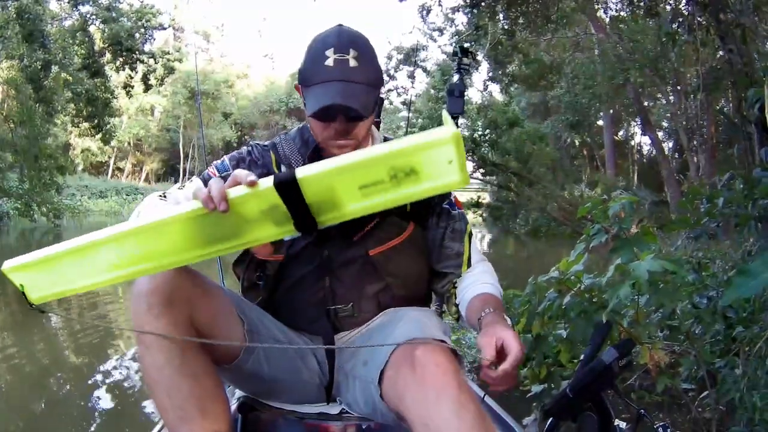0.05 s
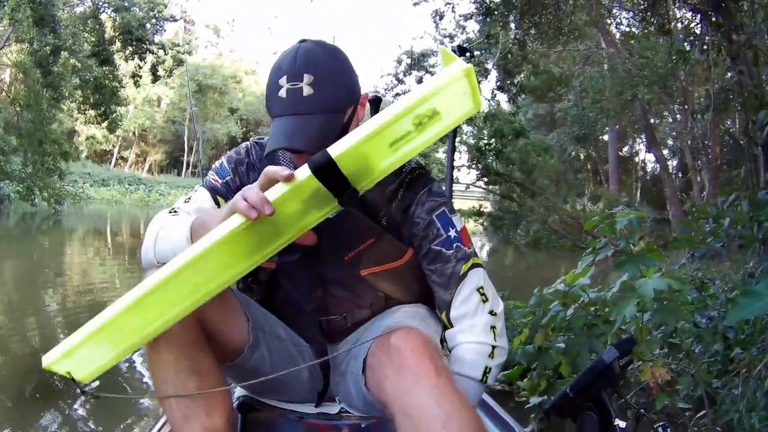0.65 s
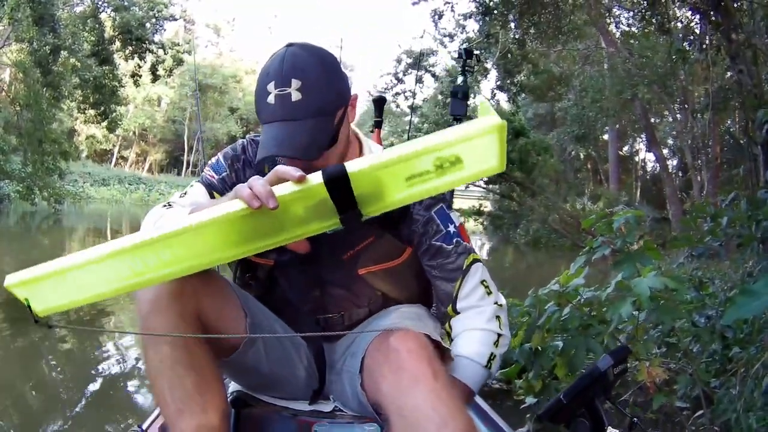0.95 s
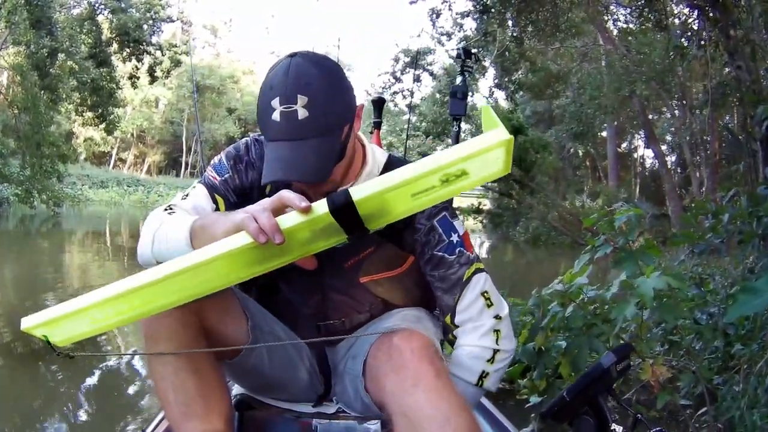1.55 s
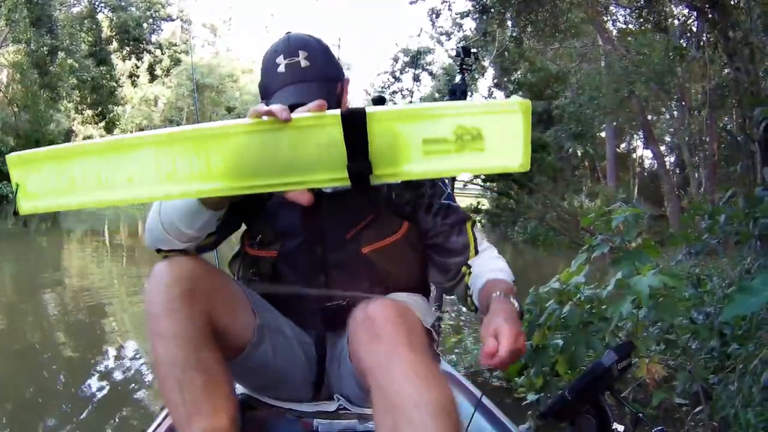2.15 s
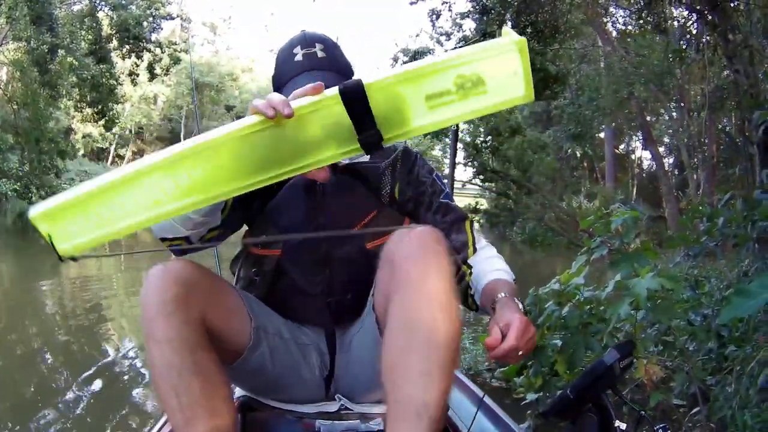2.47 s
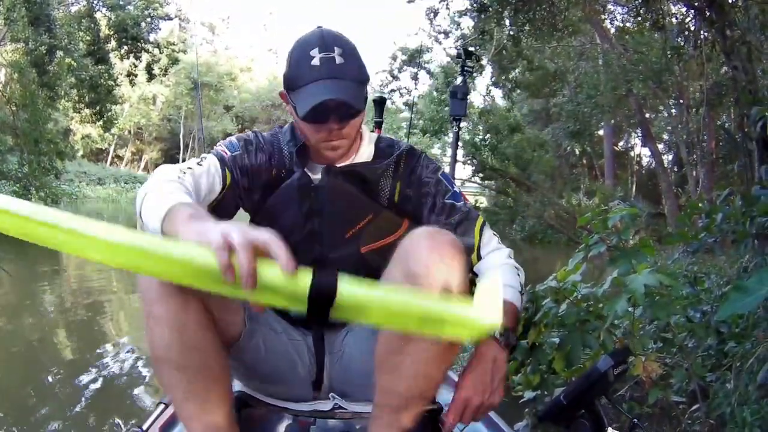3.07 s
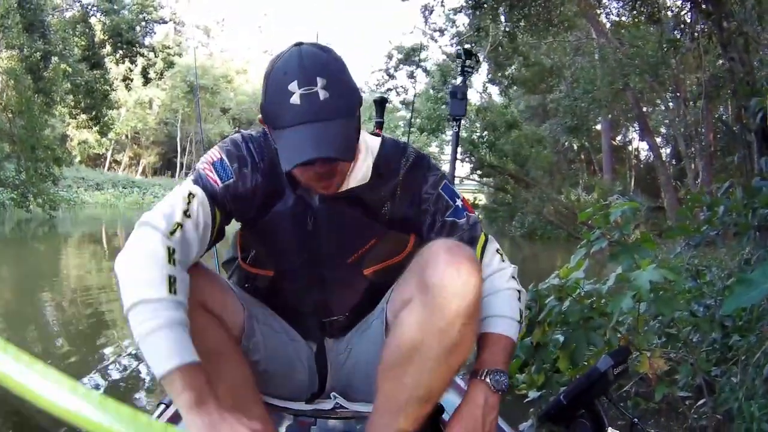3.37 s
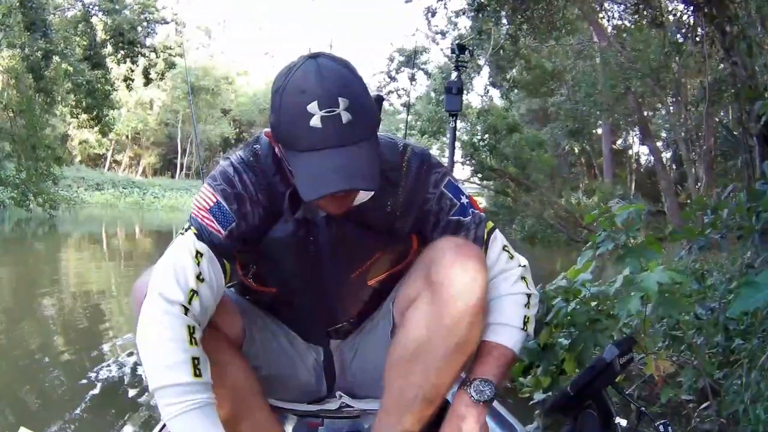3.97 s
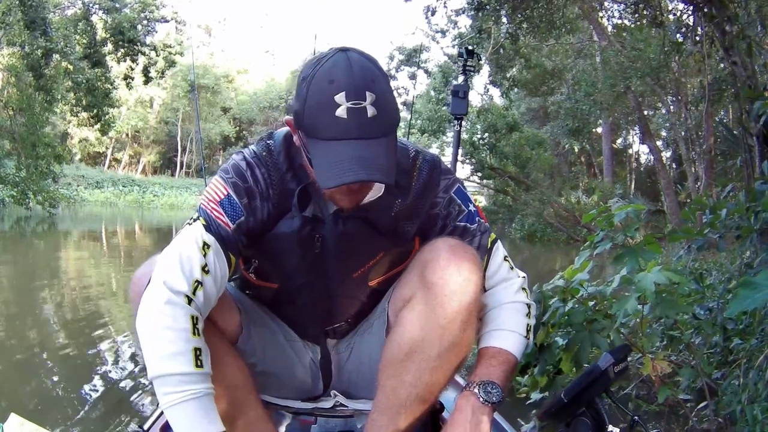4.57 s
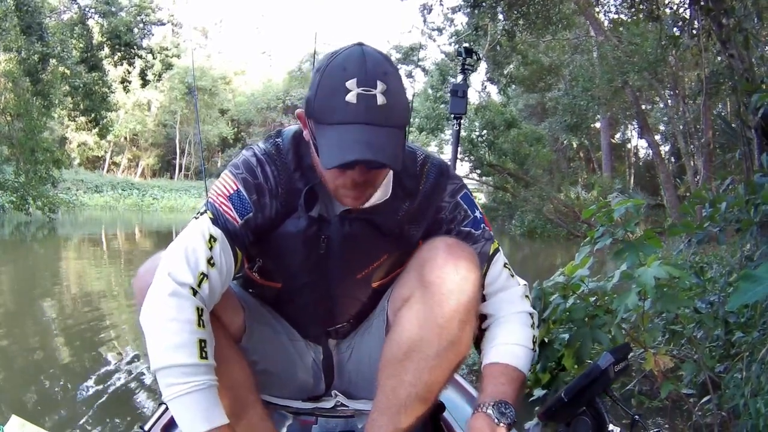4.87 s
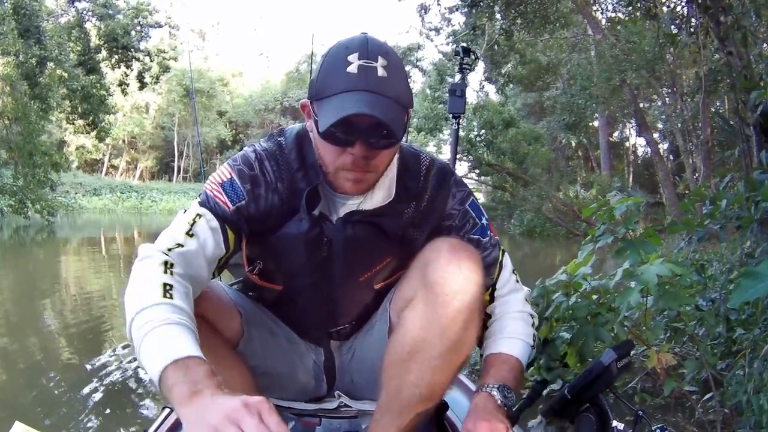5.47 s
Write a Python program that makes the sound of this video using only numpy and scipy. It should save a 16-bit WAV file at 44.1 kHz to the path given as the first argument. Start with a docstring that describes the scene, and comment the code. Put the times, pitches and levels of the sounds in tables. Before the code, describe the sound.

A hard plastic board is moved along the side of a plastic kayak, scraping and clattering with hollow booms, a low groan and a few short creaks. After a brief lull it slides down into the boat with a softer run of knocks and rubbing, ending in faint taps. Low outdoor rumble and thin hiss lie underneath. The close microphone is heard on the left only.

```python
"""Hollow booms, hard clacks and scraping: someone in a plastic kayak rummages along the hull with a
hard plastic measuring board, then slides it down into the boat. Blows and stick-slip friction ring
the hollow hull, the stiff plastic and its edges; catching parts lock on to a mode and groan or creak.
Low outdoor rumble and a thin hiss lie underneath. One close microphone feeds the left channel and
overloads on the hardest blows."""
import sys
import numpy as np
from scipy import signal
from scipy.fft import rfft, irfft, next_fast_len
from scipy.io import wavfile
from scipy.ndimage import uniform_filter1d, map_coordinates

SR = 44100
rng = np.random.default_rng(int(sys.argv[2]) if len(sys.argv) > 2 else 0)


def generate_wav(signal):
    """Clip the signal to [-1, 1] and save it as 16-bit WAV at the path in sys.argv[1]."""
    frames = np.transpose(np.atleast_2d(signal))
    scaled = np.clip(frames, -1, 1) * 32767
    pcm = np.round(scaled).astype(np.int16)
    wavfile.write(sys.argv[1], SR, pcm)


N = 252466

# Spectrum of the sharp edges. Each row: frequency in Hz, level in dB.
EDGE_SPECTRUM = [(1800, -28), (2900, -4.5), (3700, 3.5), (4400, -3), (5700, 5.5), (7000, -5), (8400, -5.5),
                 (9500, -12), (12000, -8.5), (15500, -40.5)]
# Plastic rubbing on the hull. Each row: time of firmest pressure in seconds, relative levels of
# plastic rasp, hull boom and edge scratch in dB, rise and fall in seconds.
RUB_STROKES = [(0.01, -46, -45, -67, 0.034, 0.044), (0.41, -55.5, -42.5, -76, 0.022, 0.42),
               (0.579, -40, -34, -58.5, 0.07, 0.037), (0.689, -44, -42, -67, 0.12, 0.17),
               (0.861, -32, -33.5, -51, 0.1, 0.056), (1.01, -42, -31, -62, 0.15, 0.24),
               (1.09, -24.5, -20.5, -45.5, 0.06, 0.14), (1.182, -26, -21.5, -46, 0.1, 0.064),
               (1.28, -32.5, -22, -55, 0.025, 0.041), (1.353, -31.5, -23, -54.5, 0.035, 0.092),
               (1.48, -34.5, -25.5, -56, 0.045, 0.12), (1.585, -31.5, -20, -46.5, 0.096, 0.12),
               (1.647, -27, -18.5, -46.5, 0.11, 0.13), (1.802, -34, -34.5, -54, 0.07, 0.037),
               (1.882, -34, -23, -50, 0.033, 0.068), (1.927, -30.5, -27, -50, 0.077, 0.12),
               (2.06, -61, -34.5, -78, 0.05, 0.054), (2.185, -40.5, -29.5, -63.5, 0.064, 0.14),
               (2.3, -54.5, -47, -77, 0.06, 0.22), (2.69, -68, -50.5, -65.5, 0.041, 0.06),
               (2.82, -53.5, -42.5, -79, 0.08, 0.089), (2.9, -39, -29, -66, 0.038, 0.11),
               (3.03, -39, -31.5, -61, 0.12, 0.14), (3.19, -51.5, -51, -66, 0.14, 0.31),
               (3.62, -47.5, -39.5, -70, 0.1, 0.087), (3.769, -33, -27.5, -63, 0.035, 0.12),
               (3.82, -29, -19.5, -45.5, 0.093, 0.076), (4.005, -33.5, -26, -52.5, 0.11, 0.13),
               (4.19, -34, -23, -53.5, 0.12, 0.126), (4.23, -42, -43, -53, 0.097, 0.068),
               (4.429, -41.5, -27.5, -55, 0.12, 0.073), (5.036, -49, -50.5, -77, 0.03, 0.054),
               (5.235, -58, -47, -80, 0.048, 0.11), (5.295, -56.5, -51, -74, 0.11, 0.15),
               (5.44, -56.5, -65, -80, 0.04, 0.11)]
STOW_S = 2.6  # rummaging ends, stowing begins


def amp(db):
    """Decibels to gain."""
    return 10 ** (np.asarray(db) / 20)


def unit(x):
    """x at rms 1."""
    return x / np.sqrt(np.mean(x ** 2) + 1e-20)


def steady(x, span_s):
    """x levelled to a running rms of 1."""
    size = max(int(span_s * SR), 2)
    power = uniform_filter1d(uniform_filter1d(x ** 2, size), size)
    return x / np.sqrt(np.abs(power) + 1e-12 * np.mean(x ** 2))


def wobble(rate_hz):
    """Smooth random curve, rate_hz knots a second."""
    knots = rng.standard_normal(int(N * rate_hz / SR) + 4)
    return map_coordinates(knots, [np.arange(N) * rate_hz / SR])


def body(spectrum, size=8192):
    """Minimum-phase impulse response from (Hz, dB) rows."""
    hz, db = np.transpose(spectrum)
    level_db = np.interp(np.log(np.fft.rfftfreq(size, 1 / SR) + 1), np.log(hz), db)
    cepstrum = irfft(np.log(amp(level_db)))
    cepstrum[1:size // 2] *= 2
    cepstrum[size // 2 + 1:] = 0
    return irfft(np.exp(rfft(cepstrum)))[:size // 2]


def through(x, response):
    """x filtered by an impulse response."""
    return signal.fftconvolve(x, response)[:len(x)]


def outdoors(handling, air_db):
    """Low open-air rumble, and a thin hiss that swells just behind the handling."""
    # Each row of both spectra: frequency in Hz, level in dB.
    air_spectrum = [(15, -18), (30, 0), (85, 1.5), (140, -1.5), (250, -10), (330, -17), (600, -18),
                    (1050, -22), (2200, -34.5), (4000, -42.5), (8000, -42.5), (12000, -79.5)]
    hiss_spectrum = [(2000, -10.5), (4000, -5.5), (5700, -2.5), (7200, -4), (8400, 10.5), (9200, 0),
                     (9900, 9), (11000, 3), (12000, 8), (14000, -2), (15500, -11.5)]
    # Rumble contour. Each row: time in seconds, relative level in dB.
    air_contour = [(0, -52.5), (1.5, -47.5), (2.6, -53), (4.6, -52), (5.7, -56.5)]
    rest_db, onset_db, swell_db_per_db, lag_s = -66.5, -62.5, 0.23, 0.12
    air = unit(through(rng.standard_normal(N), body(air_spectrum)))
    hiss = unit(through(rng.standard_normal(N), body(hiss_spectrum)))
    contour_db = np.interp(np.arange(N) / SR, *np.transpose(air_contour))
    power = np.abs(uniform_filter1d(handling ** 2, size=4096))
    busy_db = 10 * np.log10(1 + power / amp(onset_db) ** 2)
    pole = np.exp(-1 / (lag_s * SR))
    swell_db = swell_db_per_db * signal.lfilter([1 - pole], [1, -pole], busy_db)
    return amp(air_db + contour_db) * air + amp(rest_db + swell_db) * hiss


def ring(modes, weight_db, band_hz, order):
    """Impulse response of damped modes, weighted by how well the contact drives each."""
    hz, db, t60_s = np.transpose(modes)[:, :, None]
    t = np.arange(SR // 6) / SR
    signs = rng.choice([-1, 1], hz.shape)  # side of a node the contact falls on
    envelopes = amp(db + weight_db(hz) - 60 * t / t60_s)
    sound = np.sum(signs * envelopes * np.sin(2 * np.pi * hz * t), axis=0)
    return signal.sosfilt(signal.butter(order, band_hz, "band", fs=SR, output="sos"), sound)


def hull(centre_hz, focus_db_per_oct):
    """Hollow hull: the place of contact favours the modes near one pitch."""
    # Each row: frequency in Hz, level in dB, t60 in seconds.
    hull_modes = [(44.5, -30, 0.1), (70.6, -9, 0.64), (94.8, -6, 0.33), (136.4, 3.5, 0.075),
                  (160.4, -6.5, 0.19), (195.4, -5, 0.142), (220.5, 2, 0.041), (250.65, -2, 0.2),
                  (284.8, -0.5, 0.11), (335.8, 0.5, 0.1), (398, -1, 0.11)]
    return ring(hull_modes, lambda hz: -focus_db_per_oct * np.abs(np.log2(hz / centre_hz)),
                band_hz=(29.3, 650), order=2)


def plastic(tilt_db_per_oct):
    """Stiff plastic: a harder contact favours the upper modes."""
    # Each row: frequency in Hz, level in dB, t60 in seconds.
    plastic_modes = [(468, 4, 0.016), (556, -1, 0.046), (577, 2, 0.025), (684.3, -10.5, 0.11),
                     (742, -4, 0.036), (842, -1, 0.026), (960.5, 4, 0.019), (1065, -2, 0.017),
                     (1188, -5, 0.024), (1303, -8.5, 0.031), (1430, 0, 0.017), (1596, -8, 0.053),
                     (1715, -1, 0.014), (1979, -7, 0.021), (2237, -7.5, 0.01), (2623, -20.5, 0.042)]
    tilt = np.clip(tilt_db_per_oct, -8, 8)
    return ring(plastic_modes, lambda hz: tilt * np.log2(hz / hz[0]) + rng.normal(0, 0.76, hz.shape),
                band_hz=(387, 2940), order=4)


def pressure(strokes, range_db=20):
    """Rasp, boom and scratch gains: each stroke swells by range_db over its rise, then fades."""
    peak_s, *levels_db, rise_s, fall_s = np.transpose(strokes)[:, :, None]
    t = np.arange(N) / SR - peak_s
    distance = np.maximum(-t / rise_s, t / fall_s)
    shape = amp(-range_db * np.minimum(distance, 10))
    return [np.linalg.norm(amp(db) * shape, axis=0) for db in levels_db]


def travelling(force, place, gate, size=8192):
    """Moving contact: each stretch of force meets a new response, drawn by place()."""
    out, force = np.zeros(N + SR), np.pad(force, (0, size))
    for start in range(0, N, size // 2):
        if gate[start:start + size].max() > 1e-5:
            response = place()
            stretch = force[start:start + size] * np.hanning(size)
            piece = signal.fftconvolve(stretch, response / np.linalg.norm(response))
            out[start:start + len(piece)] += piece
    return out[:N]


def slips(rate_hz, spread_db, smooth_gain):
    """Stick-slip force: uneven jerks over a smooth rub."""
    slipping = rng.random(N) < rate_hz / SR
    strength = amp(spread_db * np.clip(rng.standard_normal(N), -2, 2))
    jerks = slipping * strength * rng.choice([-1, 1], N)
    return unit(jerks) + smooth_gain * rng.standard_normal(N)


def scrape(rasp, boom, scratch, force, hull_place, plastic_place, boom_db, rasp_db, scratch_db):
    """One friction force drives the hull, the stiff plastic and its edges."""
    # Each jerk drags an edge over the rough surface for a few ms.
    grit = np.sqrt(np.abs(uniform_filter1d(force ** 2, size=200))) * rng.standard_normal(N)
    return (amp(boom_db) * boom * steady(travelling(force, hull_place, boom), span_s=0.012)
            + amp(rasp_db) * rasp * steady(travelling(force, plastic_place, rasp), span_s=0.019)
            + amp(scratch_db) * scratch * steady(through(grit, body(EDGE_SPECTRUM)), span_s=0.025))


def groan(boom, pitch_hz, gain_db, grip_db):
    """Firm rubbing locks the stick-slip on to a hull mode, which hums."""
    hz = pitch_hz * (1 + 0.035 * wobble(60))
    locked = boom / (boom + amp(grip_db))
    tone = np.sin(2 * np.pi * np.cumsum(hz) / SR)
    return amp(gain_db + 2.3 * wobble(46.1)) * boom * locked * tone


def rummage():
    """Strokes along the side of the hull: coarse slips that make it groan."""
    rasp, boom, scratch = pressure([row for row in RUB_STROKES if row[0] < STOW_S])
    force = slips(rate_hz=680, spread_db=6.5, smooth_gain=0.52)
    rub = scrape(rasp, boom, scratch, force, lambda: hull(centre_hz=252.5, focus_db_per_oct=8),
                 lambda: plastic(tilt_db_per_oct=0), boom_db=-5.5, rasp_db=-1.5, scratch_db=-0.9)
    return rub + groan(boom, pitch_hz=258.8, gain_db=2.5, grip_db=-28)


def at_attack_level(x, db):
    """x scaled to an rms of db over its first 20 ms."""
    return amp(db) * x / np.sqrt(np.mean(x[:SR // 50] ** 2))


def knocks(boom_db, clack_db, tick_db, rattle_db, tick_t60_s, contact_t60_s):
    """Plastic strikes the boat: edge tick, rattling clack, hull boom. Harder contact is brighter."""
    # Each row: start in seconds, relative clack peak and hull boom in dB, contact hardness in dB,
    # most excited hull pitch in Hz, settling time in seconds.
    blows = [(0.386, -35.5, -42.5, 4, 232, 0.061), (0.788, -25, -38, 0, 237, 0.099),
             (0.828, -17, -25, 4.5, 326, 0.1), (0.956, -23.5, -31, -21, 250, 0.3),
             (1.009, -26, -32, 2.5, 265, 0.06), (1.05, -11, -9, 6.5, 219, 0.18),
             (1.083, -12, -13.5, -2, 210, 0.17), (1.115, -14, -17, 1, 276, 0.085),
             (1.147, -18, -17, 5.5, 244, 0.063), (1.223, -19.5, -28, 4.5, 330, 0.11),
             (1.262, -23.5, -22, -9, 274, 0.1), (1.503, -8, -10, 3, 242, 0.097),
             (1.561, -18.5, -12.5, 8.5, 248, 0.14), (1.602, -17.5, -16.5, 4, 270, 0.08),
             (1.624, -19, -23.5, 5, 258, 0.27), (1.709, -26, -26, 13.5, 169, 0.26),
             (1.772, -25, -34, 11, 322, 0.071), (1.858, -18, -19.5, 2, 272, 0.12),
             (1.895, -25, -22.5, 12.5, 256, 0.18), (2.027, -29.5, -34.5, -12, 148, 0.078),
             (2.117, -10, -14, -3.5, 274, 0.16), (2.13, -19.5, -23.5, -2, 111, 0.19),
             (2.165, -27, -27, -3, 273, 0.27), (2.233, -31, -30.5, -25, 205, 0.21),
             (2.262, -36.5, -35.5, -14, 180, 0.09), (2.76, -40, -45.5, -2, 307, 0.062),
             (2.874, -31, -33, 1, 324, 0.17), (2.918, -19.5, -34, -5, 323, 0.072),
             (2.978, -26.5, -26.5, 2, 148, 0.22), (3.041, -31.5, -28, 5, 285, 0.14),
             (3.284, -27, -42, -14.5, 166, 0.032), (3.57, -29.5, -33.5, 3.5, 149, 0.2),
             (3.607, -39, -37, -12, 138, 0.11), (3.632, -33.5, -37, -4, 137, 0.09),
             (3.685, -27.5, -35, 12.5, 271, 0.12), (3.751, -24, -36, -2, 258, 0.099),
             (3.862, -27.5, -37, 9.5, 129, 0.2), (4.04, -29.5, -25, 15.5, 199, 0.086),
             (4.091, -28.5, -29.5, -24, 212, 0.19), (4.14, -28.5, -33, 7, 276, 0.05),
             (4.379, -29.5, -38, 11.5, 333, 0.16), (5.009, -44, -50, -3, 140, 0.1),
             (5.16, -45.5, -46.5, 0, 112, 0.11), (5.21, -55, -39, 11, 130, 0.1),
             (5.305, -40.5, -41.5, -6, 110, 0.14), (5.509, -50, -69, 13, 116, 0.085)]
    out, t = np.zeros(N + SR), np.arange(SR // 4) / SR
    edge = body(EDGE_SPECTRUM)
    for start_s, peak_db, hull_db, hardness_db, hull_hz, settle_s in blows:
        rattle = amp(rattle_db - 60 * t / settle_s)
        hand_damping = amp(-18 * t / settle_s)
        clack_force = (amp(-60 * t / contact_t60_s) + rattle) * rng.standard_normal(len(t))
        clack = through(clack_force, plastic(tilt_db_per_oct=0.03 + 0.32 * hardness_db)) * hand_damping
        clack *= amp(peak_db + clack_db) / np.abs(clack).max()
        tick_force = (amp(-60 * t / tick_t60_s) + 0.17 * rattle) * rng.standard_normal(len(t))
        tick = at_attack_level(through(tick_force, edge), peak_db + hardness_db + tick_db)
        boom = at_attack_level(hull(hull_hz, focus_db_per_oct=14), hull_db + boom_db)
        start = round(start_s * SR)
        out[start:start + len(boom)] += boom
        out[start:start + len(t)] += tick + clack
    return out[:N]


def creaks(gain_db):
    """Brief stick-slip locks on to one plastic mode, rough in pitch and strength."""
    # Each row: centre in seconds, relative level in dB, pitch in Hz, half window length in seconds.
    catches = [(0.835, -31, 1820, 0.016), (1.223, -24, 1676, 0.017), (1.71, -26, 1666, 0.022),
               (1.76, -29, 1700, 0.016), (1.867, -23, 1580, 0.02), (1.874, -29.5, 2330, 0.013),
               (1.895, -30, 2290, 0.018), (1.898, -23, 1720, 0.028), (1.946, -32.5, 1990, 0.011),
               (1.988, -38, 2010, 0.023), (2.061, -43, 1630, 0.018), (2.082, -43, 1620, 0.011),
               (3.06, -48.5, 2345, 0.034), (3.068, -34, 1445, 0.014)]
    out = np.zeros(N + SR)
    jitter = 0.07 * wobble(2000)
    roughness = unit(amp(4 * wobble(350)))
    for centre_s, db, hz, half_s in catches:
        size = max(int(2 * half_s * SR), 400)
        start = round(centre_s * SR) - size // 2
        span = slice(start, start + size)
        tone = np.sin(2 * np.pi * np.cumsum(hz * (1 + jitter[span])) / SR)
        out[span] += amp(db + gain_db) * np.hanning(size) ** 2 * roughness[span] * tone
    return out[:N]


def stow():
    """The board slides down into the boat: finer, quicker slips."""
    rasp, boom, scratch = pressure([row for row in RUB_STROKES if row[0] >= STOW_S])
    force = slips(rate_hz=900, spread_db=3, smooth_gain=0.69)
    return scrape(rasp, boom, scratch, force, lambda: hull(centre_hz=208, focus_db_per_oct=7),
                  lambda: plastic(tilt_db_per_oct=-1.5), boom_db=-5, rasp_db=-1.5, scratch_db=-0.4)


def scene():
    """Close handling over open air on the left; the right is silent."""
    blows = knocks(boom_db=-4.5, clack_db=-0.43, tick_db=-33, rattle_db=-3,
                   tick_t60_s=0.052, contact_t60_s=0.011)
    handling = rummage() + stow() + blows + creaks(gain_db=-1.5)
    return np.array([handling + outdoors(handling, air_db=1.5), np.zeros(N)])


def record(dry):
    """The preamplifier soft-clips at full scale; a brick-wall low-pass follows."""
    gain_db, cutoff_hz = 6, 15500
    hot = amp(gain_db) * dry
    clipped = hot / (1 + np.abs(hot) ** 8) ** (1 / 8)
    size = next_fast_len(N + SR // 2)
    passband = np.fft.rfftfreq(size, 1 / SR) < cutoff_hz
    return irfft(rfft(clipped, size) * passband, size)[:, :N]


dry = scene()
out = record(dry)
generate_wav(out)
```